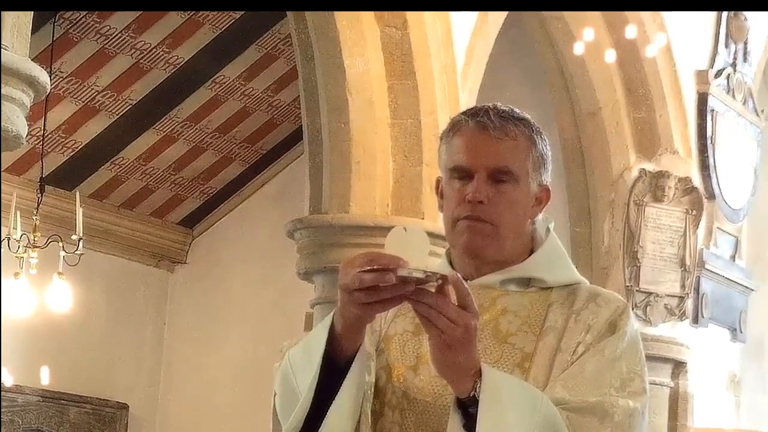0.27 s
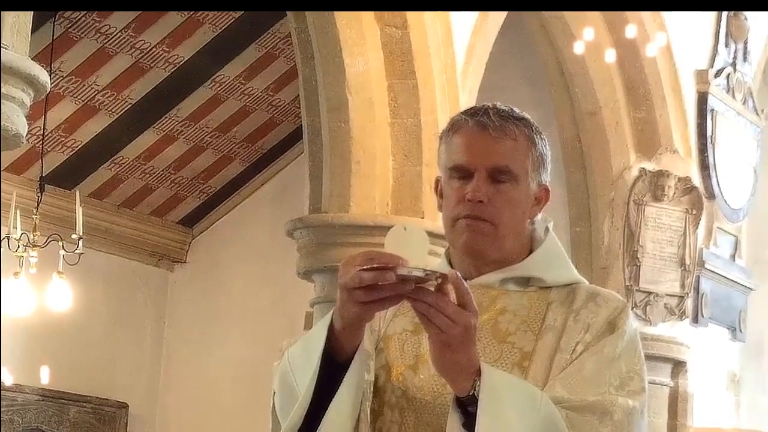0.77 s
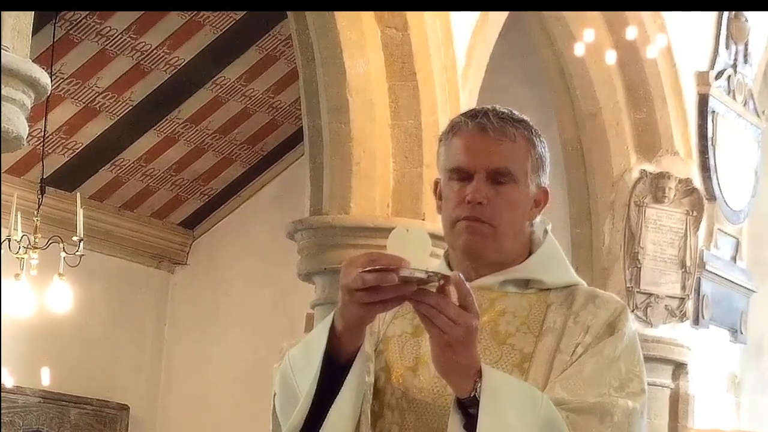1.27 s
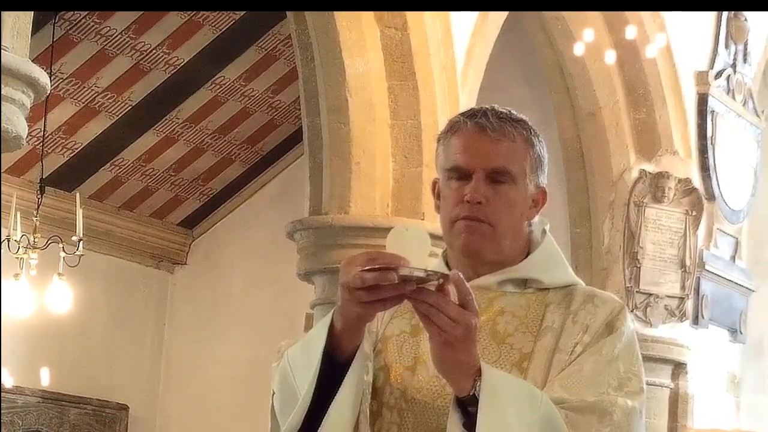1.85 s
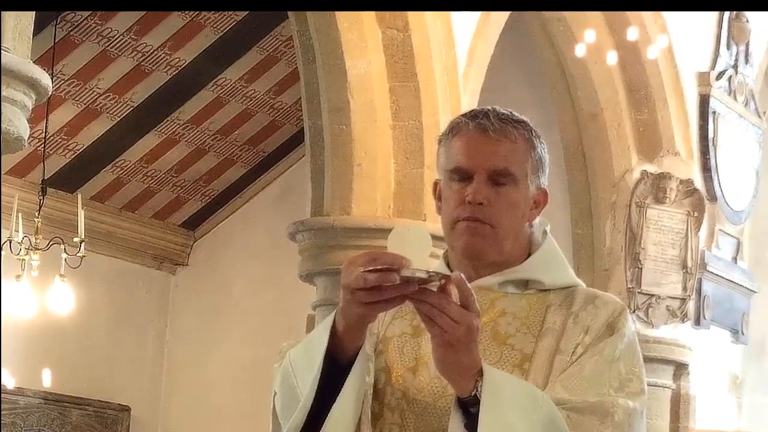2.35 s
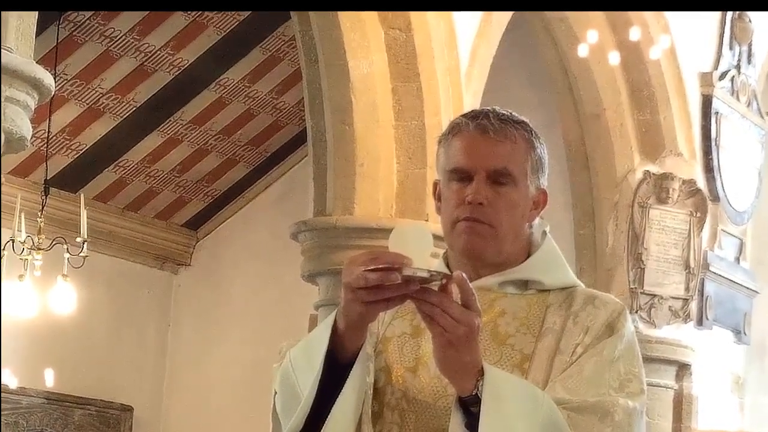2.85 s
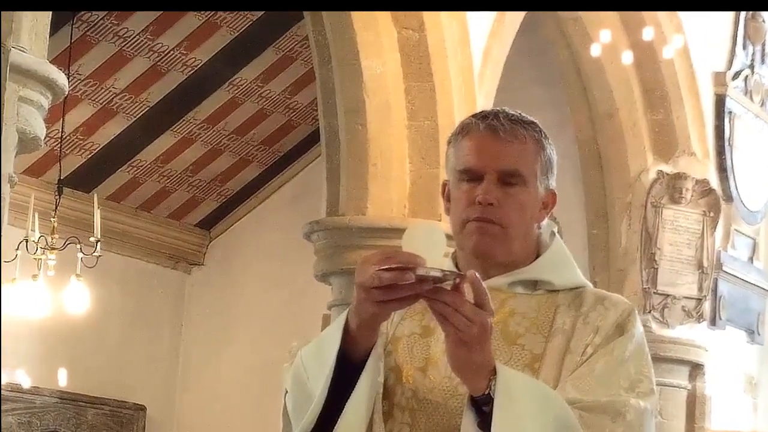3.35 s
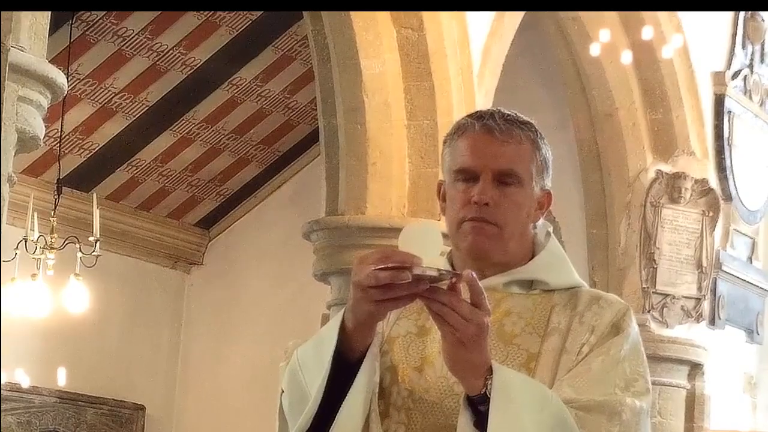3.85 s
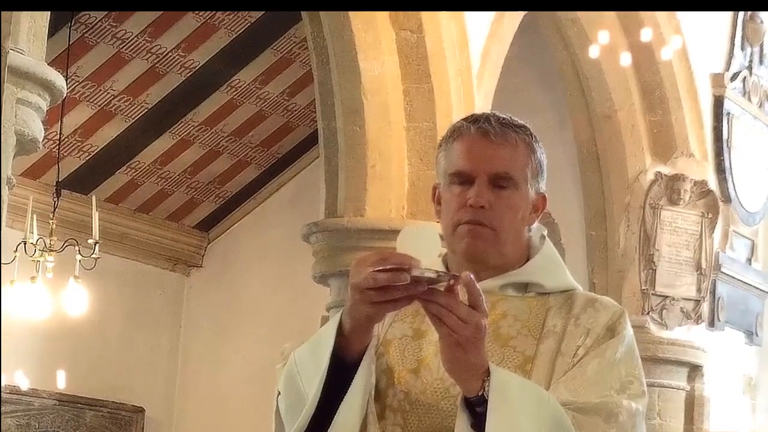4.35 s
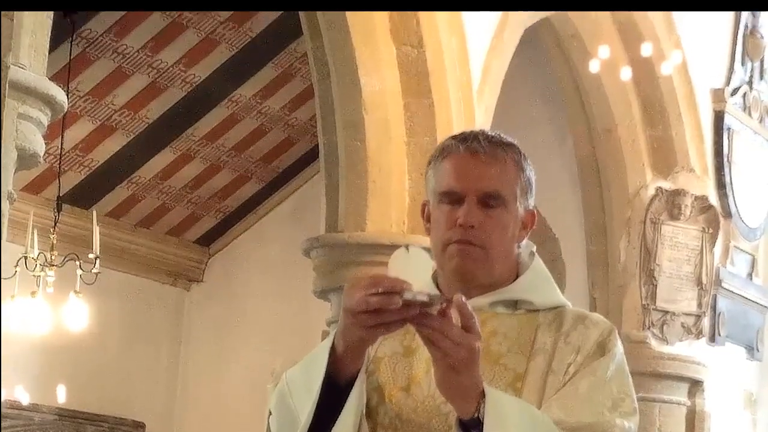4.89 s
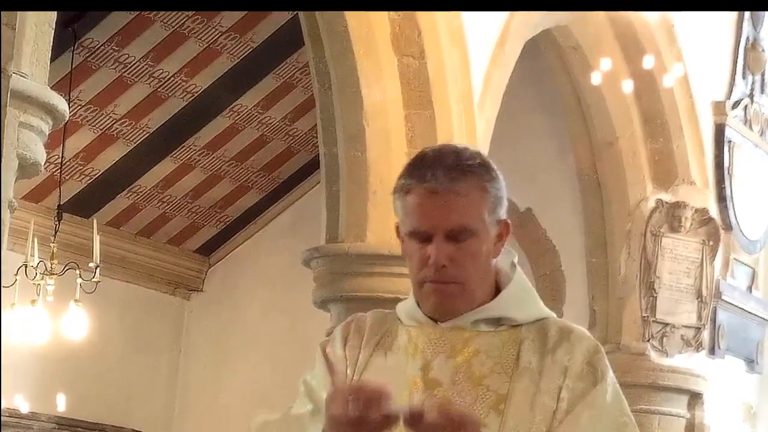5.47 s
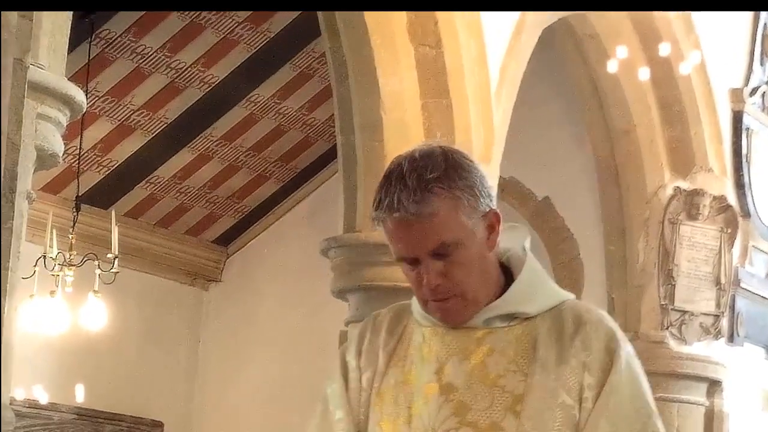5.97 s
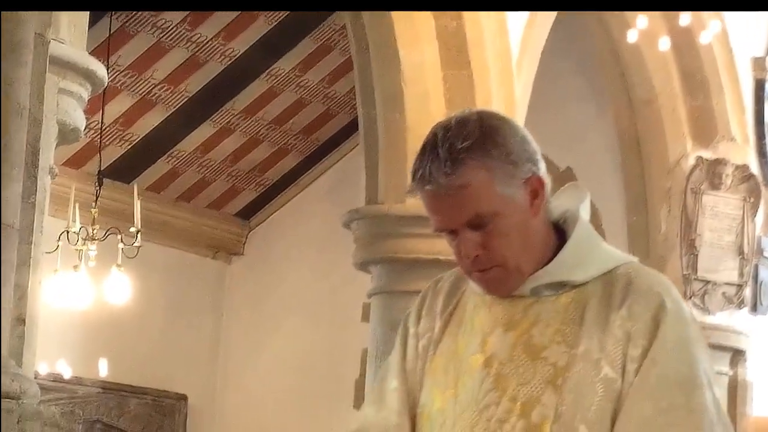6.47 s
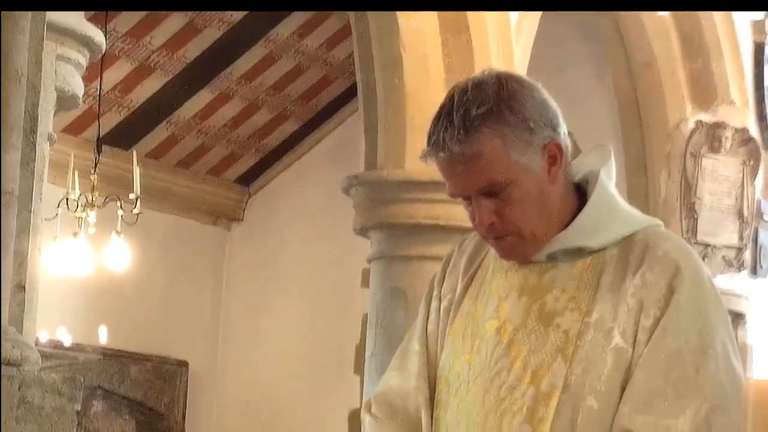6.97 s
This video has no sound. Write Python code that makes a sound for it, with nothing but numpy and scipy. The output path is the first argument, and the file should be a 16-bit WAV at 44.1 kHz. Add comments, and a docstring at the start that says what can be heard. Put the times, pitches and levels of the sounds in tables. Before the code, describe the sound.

Constant electrical hum and wavering hiss fill a quiet church while small objects knock softly, a far bird calls twice and fabric rustles once.

```python
"""A quiet stone church, taken through a sound system that hums: 50 Hz mains with a spike in every half cycle.
Soft knocks of things being handled, close to the microphone, are ticks and thuds of decaying sines.
A far bird calls twice, each call two falling whistles that ring on in the nave; cloth brushes once, as grainy noise.
Under it all lies wavering shaped-noise hiss over a low room rumble. The sound is all but mono."""
import sys
import numpy as np
from scipy import signal
from scipy.fft import rfft, irfft
from scipy.io import wavfile

SR = 44100
rng = np.random.default_rng(int(sys.argv[2]) if len(sys.argv) > 2 else 0)


def file_out(sig):
    """Save sig as 16-bit WAV at sys.argv[1]."""
    # one column per channel
    cols = np.atleast_2d(sig).T
    # limit, then scale
    lim = np.clip(cols, -1, 1)
    pcm = np.round(lim * 32767).astype(np.int16)
    wavfile.write(sys.argv[1], SR, pcm)


N = 318843
T = np.arange(N) / SR  # s


def undb(db):
    """Decibels to gain."""
    return 10 ** (np.asarray(db) / 20)


def noise(points):
    """Gaussian noise whose power density follows (f/Hz, density/dB per Hz) points, joined over log frequency."""
    hz, density_db = np.transpose(points)
    bins_hz = np.maximum(np.fft.rfftfreq(N, 1 / SR), 1)
    bin_db = np.interp(np.log(bins_hz), np.log(hz), density_db)
    gain = undb(bin_db) * np.sqrt(SR / 2)  # unit white noise spreads its power over SR / 2
    white = rng.standard_normal(N)
    return irfft(rfft(white) * gain, N)


def highpass(x, hz, order):
    """Butterworth high-pass."""
    return signal.sosfilt(signal.butter(order, hz, "high", fs=SR, output="sos"), x)


def decay(t, t60_s):
    """Exponential fade that has lost 60 dB after t60_s."""
    return np.exp(-np.log(1000) * t / t60_s)


def ring(hz, t60_s):
    """One struck mode: a decaying sine, a second long."""
    t = T[:SR]
    return np.sin(2 * np.pi * hz * t) * decay(t, t60_s)


def flicker(hz):
    """Random values, hz of them a second, joined by straight lines."""
    return np.interp(T * hz, np.arange(N), rng.standard_normal(N))


def add(out, at_s, sound):
    """Mix a sound in at the time at_s."""
    i = int(at_s * SR)
    out[i:i + len(sound)] += sound[:N - i]


def nave(x, wet_db, direct_db, t60_s=1.1):
    """The direct sound plus the dense reflections of stone walls, as a fading noise tail."""
    t = T[:2 * SR]
    tail = rng.standard_normal(len(t)) * decay(t, t60_s)
    tail = tail / np.linalg.norm(tail)  # unit energy
    reflections = signal.fftconvolve(x, tail)[:N]
    return undb(direct_db) * x + undb(wet_db) * reflections


def hum():
    """The mains sine crests apart from its overtones, which line up into a spike that flips every half cycle."""
    mains_hz = 50.062
    crest_s, spike_s = .00194, .00605
    # mains hum before it wavers: multiple of the mains frequency, rms level/dB
    partials = [(1, -39.5), (2, -80), (3, -50.5), (4, -78.5), (5, -51.5), (7, -53), (9, -61.5), (11, -68),
                (13, -66.5), (15, -70.5), (17, -69), (19, -80.4), (21, -73), (23, -76), (25, -79.5),
                (27, -74), (29, -84.5), (37, -79), (39, -82.3)]
    out = np.zeros(N)
    for multiple, rms_db in partials:
        peak_s = crest_s if multiple == 1 else spike_s
        amplitude = np.sqrt(2) * undb(rms_db)
        out += amplitude * np.cos(2 * np.pi * multiple * mains_hz * (T - peak_s))
    return out


def knocks():
    """Each contact gives a short tick and a dull thud of the body behind it, close to the microphone."""
    tick_t60_s = .017
    # soft knocks, before the nave adds to them: t/s, thud peak level/dB, tick level/dB, tick f/Hz
    contacts = [(2.289, -47, -40.5, 880), (2.424, -55, -58, 900), (4.508, -50, -54, 650),
                (4.640, -47, -46, 650), (4.782, -48, -47, 650), (4.822, -50, -58, 700),
                (4.876, -51, -50, 800), (4.971, -60, -44, 1850), (5.587, -45, -50, 750),
                (6.101, -66, -40.5, 5100), (6.288, -54, -45, 480), (6.378, -51, -41.5, 540)]
    # modes the thud rings with: f/Hz, relative level/dB, t60/s
    body_modes = [(135, 0.5, 0.17), (163, 0, 0.22), (215, -11, 0.092)]
    thud = sum(undb(db) * ring(hz, t60_s) for hz, db, t60_s in body_modes)
    thud = thud / np.abs(thud).max()
    out = np.zeros(N)
    for at_s, thud_db, tick_db, tick_hz in contacts:
        tick = ring(tick_hz, tick_t60_s)
        add(out, at_s, undb(thud_db) * thud + undb(tick_db) * tick)
    return nave(out, wet_db=-4, direct_db=0)


def bird():
    """Each call is a pair of like whistles, falling and trembling in pitch, heard mostly as reflections."""
    note_s, note_step_s = .066, .07
    start_hz, end_hz = 2900, 2172
    flutter, flutter_hz = 0.039, 110  # depth as a share of the pitch, rate
    # bird calls: t/s, rms level of a held note ahead of the nave/dB
    calls = [(1.798, -53), (6.125, -53.5)]
    t = T[:int(note_s * SR)]
    tremble = 1 + flutter * np.sin(2 * np.pi * flutter_hz * t)
    hz = np.linspace(start_hz, end_hz, len(t)) * tremble
    swell = signal.windows.tukey(len(t), .2)  # a tenth of the note to rise, a tenth to fall
    note = np.sqrt(2) * swell * np.sin(2 * np.pi * np.cumsum(hz) / SR)
    out = np.zeros(N)
    for at_s, db in calls:
        add(out, at_s, undb(db) * note)
        add(out, at_s + note_step_s, undb(db) * note)
    return nave(out, wet_db=-1.0, direct_db=-5.5)


def cloth():
    """A sleeve slides over a robe, catching and slipping in small grains: noise of randomly flickering level."""
    start_s, attack_s, hold_s, release_s = 6.04, .05, 0.24, .18
    gain_db, grain_db, grain_hz = 0.5, 3, 60
    # colour of the brush, before gain and grain: f/Hz, density/dB per Hz
    brush_density = [(200, -110), (1000, -99), (3000, -95), (5000, -94), (7500, -104), (14000, -115)]
    corners_s = start_s + np.cumsum([0, attack_s, hold_s, release_s])
    stroke = np.interp(T, corners_s, [0, 1, 1, 0])
    rustle = noise(brush_density)
    grain = undb(gain_db + grain_db * flicker(grain_hz))
    return rustle * stroke * grain


def hiss():
    """Amplifier hiss over room rumble, almost mono; a very faint opposed noise is added above 4300 Hz."""
    # hiss and low room rumble, before they waver: f/Hz, density/dB per Hz
    hiss_density = [(10, -84), (35, -77), (58, -75), (110, -85), (200, -84), (500, -87.5), (1000, -89),
                    (2000, -89.5), (4000, -90.5), (8000, -92), (13500, -93.5), (15000, -96), (15700, -100)]
    opposed = undb(-45) * highpass(noise(hiss_density), 4300, order=10)
    return noise(hiss_density) + np.array([[1], [-1]]) * opposed


def waver():
    """Random wavering in dB, mostly two to ten times a second, for the level of the hiss and the hum."""
    # strength of the wavering by its rate: f/Hz, density of the dB wavering/dB per Hz
    waver_density = [(1, -19), (2.2, -9), (4, -14.5), (8, -13.5), (13, -18.5), (30, -26), (80, -71)]
    return noise(waver_density)


def scene():
    """Hum, bird, knocks and cloth sit in the centre of the hiss, which wavers by about a decibel."""
    hum_share = .22  # the hum follows this share of the wavering
    waver_db = waver()
    wavering_hiss = undb(waver_db) * hiss()
    wavering_hum = undb(hum_share * waver_db) * hum()
    return wavering_hiss + wavering_hum + bird() + knocks() + cloth()


def record(dry):
    """The recorder cuts the top with a steep elliptic low-pass."""
    top_hz = 15750
    low_pass = signal.ellip(12, .1, 90, top_hz, fs=SR, output="sos")  # .1 dB ripple, 90 dB stop band
    return signal.sosfilt(low_pass, dry)


dry = scene()
out = record(dry)
file_out(out)
```